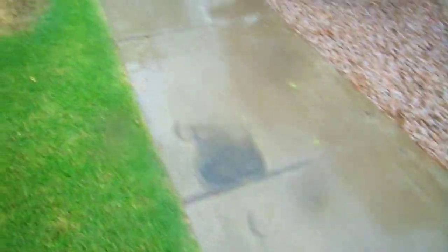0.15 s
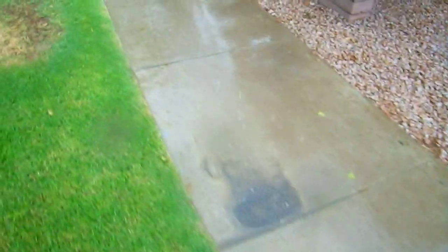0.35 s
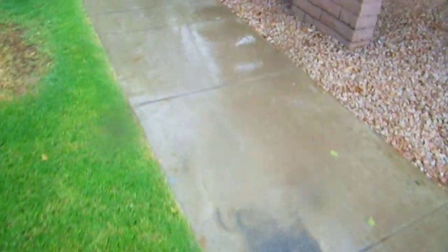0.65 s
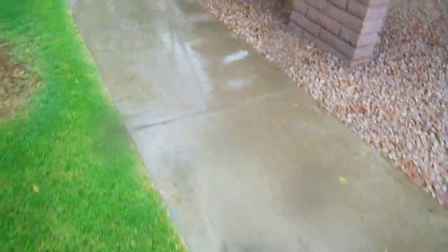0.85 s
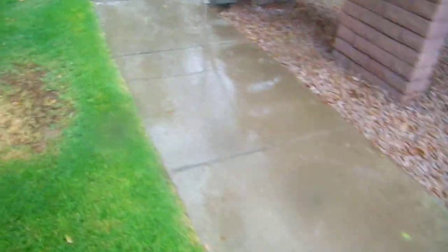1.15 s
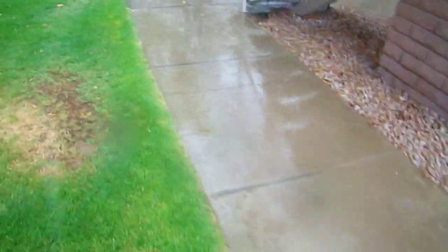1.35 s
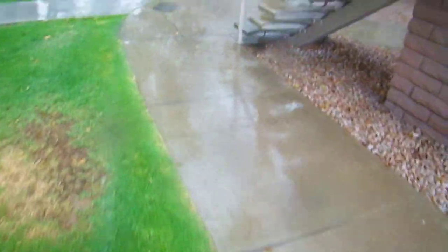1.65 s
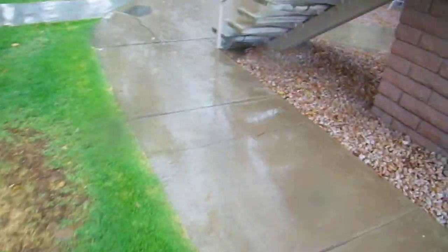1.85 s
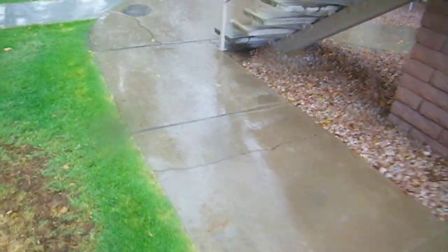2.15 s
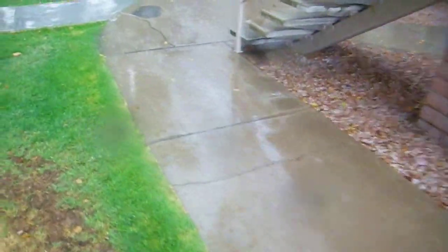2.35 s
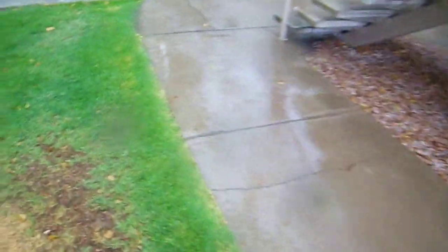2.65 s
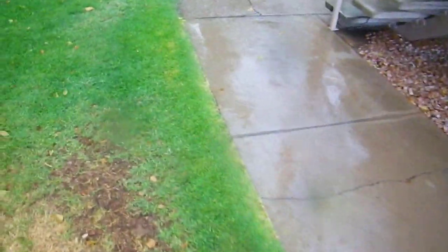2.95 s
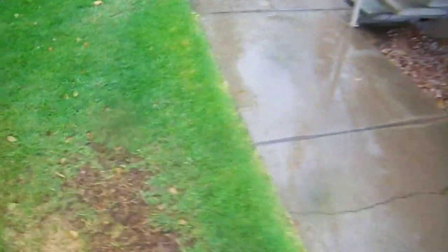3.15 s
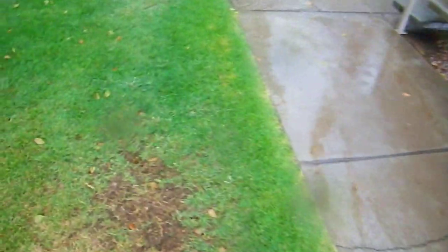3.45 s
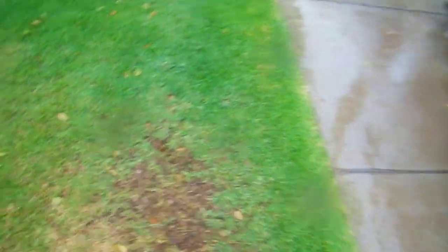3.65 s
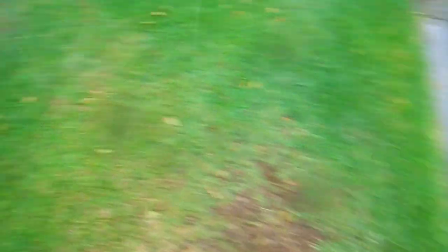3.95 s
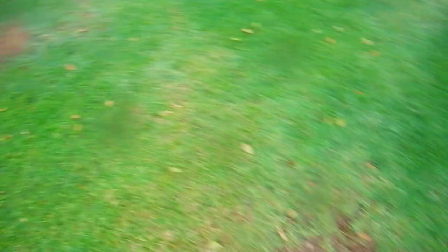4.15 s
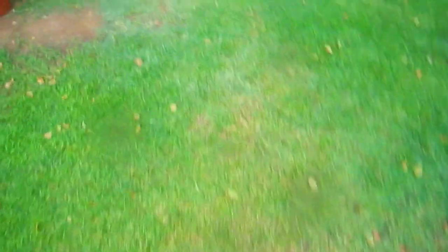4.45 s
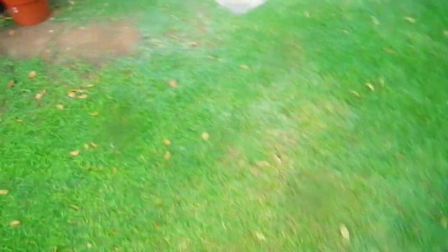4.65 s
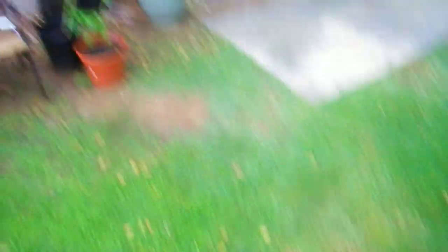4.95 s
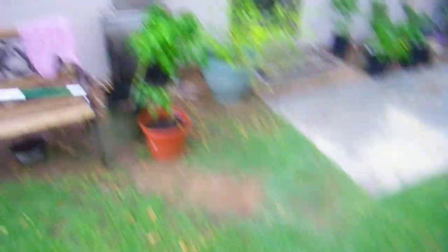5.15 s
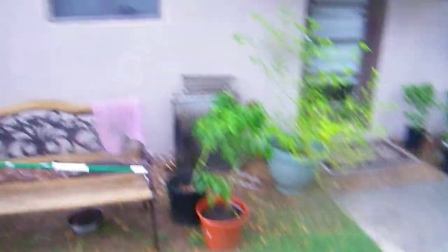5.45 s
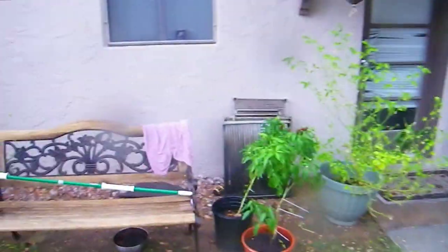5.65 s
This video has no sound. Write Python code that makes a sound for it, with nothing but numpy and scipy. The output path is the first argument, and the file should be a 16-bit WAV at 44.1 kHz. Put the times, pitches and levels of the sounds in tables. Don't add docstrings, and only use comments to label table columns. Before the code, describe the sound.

Outdoor downpour with a bright, slightly boxy small-microphone sound. Rapid ticks and splashes burst close by at first, mixed with short hollow plastic taps. Automatic gain makes the rain sink instantly after hard hits and climb steadily afterward. The loudest distorted smack comes around 2.2 seconds, lighter taps follow near 3.1, and a late smack lands at 4.8. Faint downpipe gurgles lie beneath the rain.

```python
import sys
import numpy as np
from scipy import signal
from scipy.fft import rfft, irfft
from scipy.io import wavfile
from scipy.ndimage import uniform_filter1d, map_coordinates

SR = 44100
rng = np.random.default_rng(int(sys.argv[2]) if len(sys.argv) > 2 else 0)


def materialize(psi):
    bounded = np.clip(np.atleast_2d(psi).T, -1, 1)
    quanta = np.round(bounded * 32767).astype(np.int16)
    wavfile.write(sys.argv[1], SR, quanta)


def rack_gain(trim_db):
    fader = np.asarray(trim_db, float)
    return 10 ** (fader / 20)


N = 255780


def unit(x):
    return x / np.sqrt(np.mean(x ** 2) + 1e-20)


def wobble(rate):
    knots = rng.standard_normal(int(N * rate / SR) + 4)
    return map_coordinates(knots, [np.arange(N) * rate / SR])


def coloured(x, spectrum):
    taps = 8192
    f, db = np.transpose(spectrum)
    log_hz = np.log(np.fft.rfftfreq(taps, 1 / SR) + 1)
    gain = rack_gain(np.interp(log_hz, np.log(f + 1), db))
    cepstrum = irfft(np.log(gain + 1e-4), taps)
    cepstrum[1:taps // 2] *= 2
    cepstrum[taps // 2 + 1:] = 0
    response = irfft(np.exp(rfft(cepstrum)), taps)[:taps // 2]
    return signal.fftconvolve(x, response)[:N]


def patchy(patchy_db):
    cells = signal.stft(rng.standard_normal(N + 512), nperseg=256)[2]
    field = uniform_filter1d(rng.standard_normal(cells.shape), size=5, axis=0)
    field = uniform_filter1d(field, size=8, axis=1)
    noise = signal.istft(cells * rack_gain(patchy_db * unit(field)), nperseg=256)[1]
    return unit(noise[:N])


def grains(count, centre_hz, spread, cycles, scatter_db):
    u, t = rng.random((count, 3)), np.arange(160) / SR
    hz = np.clip(centre_hz * np.exp(spread * rng.standard_normal((count, 1))), 300, 15000)
    size_db = np.minimum(-scatter_db * np.log(1 - u[:, 1:2]), 1.7 * scatter_db)
    size = rack_gain(size_db) * np.sqrt(hz / centre_hz)
    wave = size * np.exp(-t * hz / cycles) * np.sin(2 * np.pi * (hz * t + u[:, 2:]))
    at = (u[:, :1] * N).astype(int) + np.arange(len(t))
    return unit(np.bincount(at.ravel(), wave.ravel(), N + len(t))[:N])


def ring(t, hz, t60, rise=0.00018):
    return np.sin(2 * np.pi * hz * t) * rack_gain(-60 * t / t60) * (1 - np.exp(-t / rise))


def burst(t, lo_hz, hi_hz, t60):
    band = signal.butter(2, [lo_hz, hi_hz], "band", fs=SR, output="sos")
    shape = rack_gain(-60 * t / t60) * (1 - np.exp(-t / 0.00019))
    return shape * unit(signal.sosfilt(band, rng.standard_normal(len(t))))


def gain_db():
    # start_s, drop_db
    ducks = [
        (0.376, 9.5),
        (0.702, 6.5),
        (1.041, 2),
        (1.277, 7.5),
        (1.386, 1.5),
        (2.236, 26.5),
        (3.054, 3.5),
        (3.1856, 6.5),
        (4.807, 16),
    ]
    t = np.arange(N) / SR
    falls = sum(drop_db * (1 - np.exp(-np.maximum(t - s, 0) / 0.0019)) for s, drop_db in ducks)
    return 12.19 * t - falls


def rain():
    # time_s, strength_db, patter_nearness_db
    shower = [(0, -0.8, 2), (.25, -1.6, 3.5), (.45, -0.05, -0.5), (1, 0.4, 6), (1.5, 0.15, 1),
              (2.2, -.1, 2.5), (2.5, -0.2, -8), (2.8, -1.5, 3.5), (3.1, -0.7, -3), (3.4, 0.8, 2),
              (4, -0.5, 1), (4.6, -0.9, 0), (4.9, -.5, -2), (5.2, -1.5, -10), (5.5, -1.5, -2),
              (5.8, -2, -9)]
    # frequency_hz, density_db
    rain_colour = [(180, -33), (300, -16.5), (468, -14), (731, -12.5), (892, -18.5), (1220, -5),
                   (1870, -10.5), (3400, -4), (3810, -6.5), (4650, 1), (7880, -15.5), (8560, -12.5),
                   (9930, -20), (14500, -32.5), (15500, -33)]
    # frequency_hz, density_db
    rumble_colour = [(15, -18), (25, -9), (65, 2), (245, -2), (284, 0), (452, -10), (500, -11), (650, -39),
                     (1100, -120)]
    s, *controls = np.transpose(shower)
    strength_db, near_db = [np.interp(np.arange(N) / SR, s, c) for c in controls]
    far = rack_gain(1.28 * wobble(12)) * patchy(patchy_db=0.7)
    patter = grains(count=14000, centre_hz=5000, spread=0.83, cycles=0.94, scatter_db=0.0)
    patter = rack_gain(-6.5 + 2.1 * wobble(25)) * patter
    near = grains(count=1300, centre_hz=5490, spread=0.56, cycles=1.6, scatter_db=3.0)
    near = rack_gain(-11.0 + near_db) * near
    rumble = rack_gain(-41.5 + 1.1 * wobble(2.5)) * unit(coloured(patchy(patchy_db=0.5), rumble_colour))
    return rack_gain(-22.5 + strength_db) * unit(coloured(far + patter + near, rain_colour)) + rumble


def gurgles(gain):
    # start_s, level_db, pitch_hz, t60_s
    slugs = [
        (.82, -28.5, 295.5, 0.18),
        (0.874, -28, 269, 0.11),
        (3.9, -44, 284, 0.27),
        (3.981, -42, 289, 0.24),
        (5.221, -44.5, 185, 0.17),
    ]
    out, t = np.zeros(N + SR), np.arange(SR // 4) / SR
    for s, db, hz, t60 in slugs:
        i = round(s * SR)
        out[i:i + len(t)] += rack_gain(db - gain[i]) * ring(t, hz, t60, rise=0.028)
    return out[:N]


def splashes(rows, t60):
    z = rng.standard_normal((len(rows), 3))
    drops = []
    for (s, db), (a, b, c) in zip(rows, z):
        hz = 4650 * (1 + 0.042 * a)
        spray_db, body_db = -32 - 2 * b, -27 - 2 * c
        drops.append((s, db, hz, spray_db, body_db, t60))
    return drops


def ticks(gain):
    # start_s, peak_db, ring_hz, spray_db,
    # body_db
    cracks = [(.376, 4.5, 4830, -33, -37), (0.7021, 5.5, 3560, -13.5, -11), (1.0383, 2, 4850, -23, -4.5),
              (1.2728, -9.5, 3600, -20, -12), (1.276, 1.5, 3360, -32, -5), (1.3836, -4.5, 3430, -36, -2.5),
              (1.525, -14.5, 3530, -29, -19), (1.8927, -11, 3220, -12, -27), (2.0238, -13, 3450, -25, -1),
              (2.155, -3.5, 4940, -26.5, -26), (2.172, -4, 4140, -32, -13), (2.2352, 10.5, 3480, -14, -5),
              (2.9747, -4, 3500, -46, -47), (3.055, -9.5, 4900, -34, 1), (3.1838, -10, 3460, -33, -28),
              (3.185, -12.5, 3300, -15, 0), (3.6378, -11, 3410, -35, -38), (3.925, -24.5, 4630, -27, 3),
              (4.3962, -1.5, 3500, -33, -33), (4.8043, 0, 3590, -32, -0.5), (5.594, -22, 3420, -29, -22)]
    # start_s, peak_db
    near_splashes = [(.2159, -0.5), (.2589, 2.5), (.4364, -7), (.5072, -5), (.5926, -5.5), (.8011, -5.5),
                     (.8628, -6.5), (1.1578, -8), (1.2104, -2), (1.2206, -4), (1.4915, -10.5),
                     (1.5938, -11), (1.7899, -6), (2.3456, -27), (2.5691, -21.5), (2.8255, -21),
                     (3.0415, -18.5), (3.0954, -19), (3.1747, -20), (3.2828, -23.5), (3.3194, -19),
                     (3.3977, -23), (3.473, -23), (3.4908, -16.5), (3.6212, -19), (3.6763, -17.5),
                     (3.807, -19.5), (4.0193, -15), (4.1789, -16), (4.3175, -13.5)]
    # start_s, peak_db
    more_splashes = [(.0044, -7), (.0107, -3), (.1034, -7), (.1133, -4), (.193, -5), (.2952, 0), (.3064, -9),
                     (.3282, -4), (.3412, -1.5), (.3569, -1), (.3678, -2), (.4983, -9), (.8934, -10),
                     (1.1144, -22), (1.5658, -10.5), (2.1932, -10.5), (2.4384, -30), (2.7255, -22), (2.7616, -24),
                     (2.797, -23), (3.2151, -26), (3.5454, -21), (4.3086, -17), (4.327, -18), (4.348, -15),
                     (4.5012, -15), (4.874, -28), (4.9398, -22.5), (5.1716, -26), (5.5541, -21)]
    out, t = np.zeros(N + SR), np.arange(900) / SR
    drops = [(*row, 0.0083) for row in cracks]
    drops += splashes(near_splashes, t60=0.0064) + splashes(more_splashes, t60=0.0061)
    for s, db, hz, spray_db, body_db, t60 in drops:
        i = round((s + 0.00069) * SR)
        crackle = rack_gain(-6.5) * burst(t, lo_hz=0.71 * hz, hi_hz=1.43 * hz, t60=0.012)
        spray = rack_gain(spray_db + 3.5) * burst(t, lo_hz=6150, hi_hz=10800, t60=0.004)
        body = -rack_gain(body_db + 10.0) * ring(t, 2280, t60=0.0024)
        out[i:i + len(t)] += rack_gain(db - 2.5 - gain[i]) * (crackle + spray + body + ring(t, hz, t60))
    return out[:N]


def knocks(gain):
    # start_s, peak_db, ring_hz, low_mode_db, damping_s
    strikes = [(.343, -21.5, 1520, -12.5, .004), (.702, -16, 1390, -24, 0.0041),
               (1.006, -11.5, 1135, -18, 0.0029), (1.039, -6.5, 1270, -23.5, 0.0032),
               (1.277, -6, 1290, -30, 0.0035), (1.3836, -8.5, 1307, -31, 0.0043),
               (1.606, -15, 1200, -19, .003), (1.719, -22.5, 1220, -19, 0.003),
               (2.024, -16, 1280, -28, .0035), (2.156, -12.5, 1430, -12.5, 0.0047),
               (2.221, -17, 1200, -16, 0.0034), (2.236, 7.5, 1296, -24.5, 0.0058),
               (2.9765, -26, 1290, -11.5, 0.0051), (3.056, -5, 1377, -12.5, 0.0045),
               (3.1846, -1.5, 1183, -15.5, 0.0045), (3.331, -18.5, 1166, -14.5, .0036),
               (3.475, -35.5, 1320, -12.5, 0.006), (3.506, -29, 1190, -13, .004),
               (3.884, -31.5, 1310, -21, 0.0036), (4.396, -30.5, 990, -9, 0.0064),
               (4.8051, 3, 1252, -17, 0.0054), (5.732, -18, 1215, -12.5, 0.0042)]
    out, t = np.zeros(N + SR), np.arange(2200) / SR
    for s, db, hz, low_db, damping in strikes:
        i = round(s * SR)
        water_damping = np.clip(1 - (t / (1.45 * damping)) ** 1.94, 0, 1)
        shell = ring(t, hz, t60=0.19, rise=0.00087) * water_damping
        after = -rack_gain(-23.0) * ring(t, 0.96 * hz, t60=0.013, rise=0.0056)
        low = rack_gain(low_db + 8.5) * (ring(t, 720, t60=0.015) + 0.91 * ring(t, 500, t60=0.0088))
        push_db = -22 - 0.34 * db + 0.56 * low_db
        push = -rack_gain(push_db + 18.5) * (1 - t / 0.0007) * np.exp(-t / 0.00044)
        out[i:i + len(t)] += rack_gain(db + 3.0 - gain[i]) * (shell + after + low + push)
    return out[:N]


def scene():
    gain = gain_db()
    return (rain() + gurgles(gain) + ticks(gain) + knocks(gain))[None]


def port_response(hz):
    # centre_hz, width_hz, depth (0-1)
    notch_hz, notch_width, depth = (7880, 300, 0.9)
    # centre_hz, width_hz, level_db
    cavity_modes = [(3500, 490, 4.5), (3770, 340, -5), (4550, 200, 1), (5630, 620, -2.5), (6300, 530, 1.5),
                    (10050, 380, 4), (14500, 1000, 4), (15700, 700, -4.5)]

    def bump(centre, width, size):
        damping = 1j * hz * width
        return 1 + size * damping / (centre ** 2 - hz ** 2 + damping + 1e-9)

    peaks = [bump(centre, width, rack_gain(db) - 1) for centre, width, db in cavity_modes]
    return bump(notch_hz, notch_width, -depth) * np.prod(peaks, axis=0)


def low_pass(x):
    return signal.sosfilt(signal.butter(12, 16680, fs=SR, output="sos"), x)


def record(dry):
    hz = np.fft.rfftfreq(N, 1 / SR)
    x = irfft(rfft(dry) * port_response(hz) * (hz < 15750), N)
    x = x * rack_gain(gain_db())
    x = x / (1 + np.abs(x / 0.74) ** 5) ** (1 / 5)
    cut_hz = 35
    bass_cut = 1j * hz / (cut_hz + 1j * hz)
    mix = irfft(rfft(x) * bass_cut * (hz < 16600), N)
    return low_pass(mix)


dry = scene()
out = record(dry)
materialize(out)
```